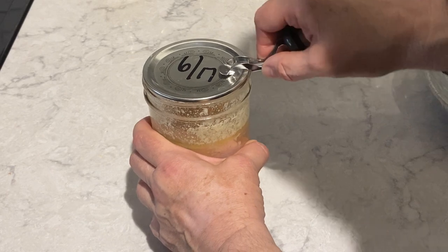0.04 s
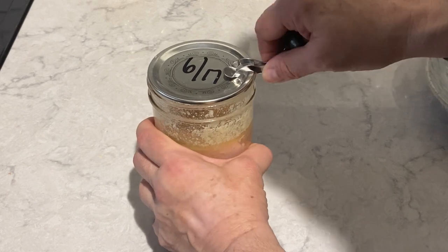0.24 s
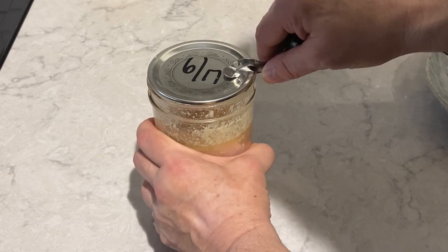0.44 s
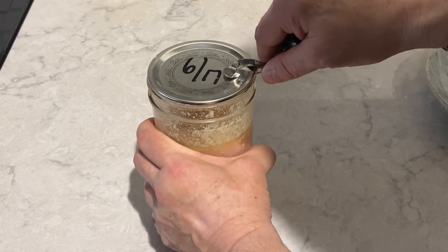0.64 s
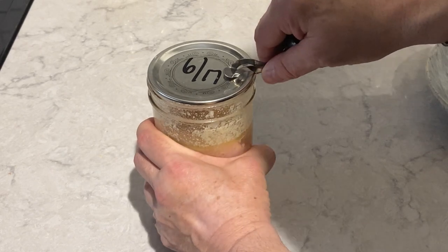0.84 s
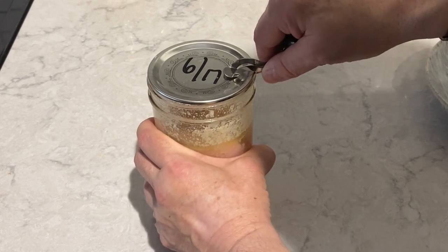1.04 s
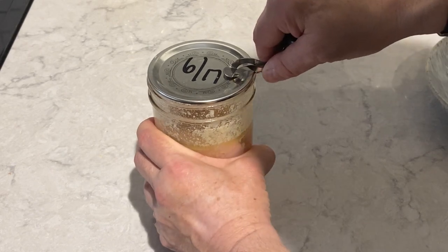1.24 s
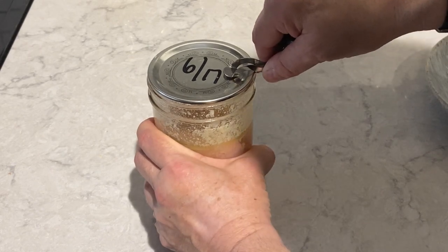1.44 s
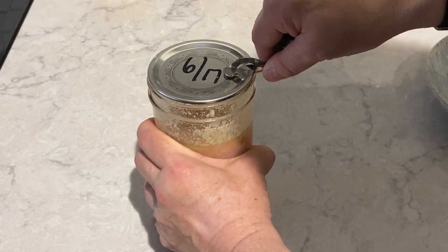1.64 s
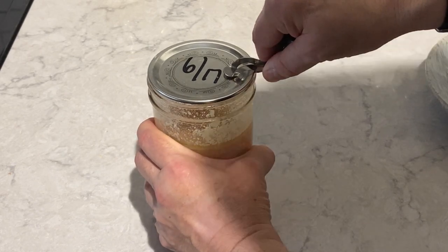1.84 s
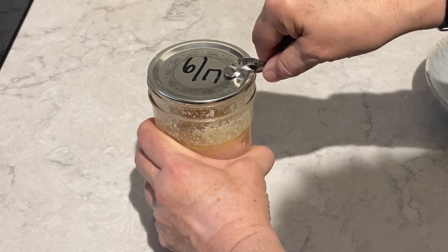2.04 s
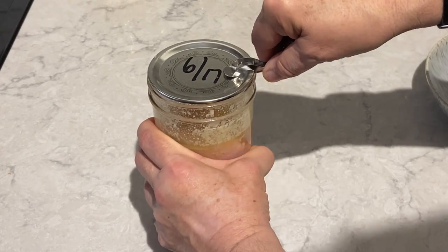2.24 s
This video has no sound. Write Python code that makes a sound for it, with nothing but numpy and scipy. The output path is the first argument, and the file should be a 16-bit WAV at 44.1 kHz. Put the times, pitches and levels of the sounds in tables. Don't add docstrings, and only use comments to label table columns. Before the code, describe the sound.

A loud, clipped knock of a metal opener on a sealed glass jar lid, then small ticks

```python
import sys
import numpy as np
from scipy import signal
from scipy.fft import rfft, irfft
from scipy.io import wavfile
from scipy.ndimage import uniform_filter1d

SR = 44100
rng = np.random.default_rng(int(sys.argv[2]) if len(sys.argv) > 2 else 0)


def persist_wave(psi):
    counts = np.round(np.clip(psi, -1, 1) * 32767).astype(np.int16)
    wavfile.write(sys.argv[1], SR, np.atleast_2d(counts).T)


def volts(x):
    e = np.asarray(x, float) / 20
    return 10 ** e


N = 101429
T = np.arange(N) / SR


def shape(x, gain_db):
    hz = np.arange(N // 2 + 1) * SR / N + 1
    return irfft(rfft(x) * volts(gain_db(hz)), N)


def curve(table):
    hz, db = np.array(table, float).T
    log_hz = np.log(np.r_[hz[0] / 8, hz, hz[-1] * 8])
    levels = np.r_[db[0] - 60, db, db[-1] - 60]
    return lambda f: np.interp(np.log(f), log_hz, levels)


def band(hz, wide):
    x = shape(rng.standard_normal(N), lambda f: -20 * np.log10(1 + ((f - hz * hz / f) / wide) ** 2))
    return x / x.std()


def fade(at, t60):
    return (T >= at) * volts(-60 * np.clip(T - at, 0, None) / t60)


def ring(at, hz, t60):
    return fade(at, t60) * np.sin(2 * np.pi * hz * (T - at))


def hump(at, length):
    return np.sin(np.pi * np.clip((T - at) / length, 0, 1)) ** 2


def walk(rate):
    width = int(SR / rate)
    x = uniform_filter1d(uniform_filter1d(rng.standard_normal(N), width), width)
    return x / x.std()


def kitchen():
    # pitch_hz, level_db (per Hz)
    rumble = [(22, -10.5), (38, -6), (62, 4), (120, -6), (200, -0.5), (260, -4), (420, -8.5), (650, -22.5)]
    # pitch_hz, level_db (per Hz)
    hiss = [(500, -22), (1200, -24), (2600, -28.5), (3100, -35.5), (5300, -42.5), (5800, -48.5),
            (8000, -54.5), (14000, -58.5)]
    # pitch_hz, level_db
    side_gain = [(40, -16.5), (200, -15), (500, -3), (1700, -4), (3300, -18), (7000, -2.5), (10000, 4),
                 (14000, -3)]
    # pitch_hz, width_hz, level_db
    hums = [(2103, 66, -65.5), (2640, 100, -77.5), (4200, 290, -75.5), (4970, 130, -83)]
    air_db, flicker_db, swell_db = -41, -0.22, 1
    air, wider = 0, curve(side_gain)
    for table in (rumble, hiss):
        colour = curve(table)
        flow = volts(flicker_db * walk(27.4) + swell_db * walk(0.47))
        mid = shape(rng.standard_normal(N), colour)
        side = shape(rng.standard_normal(N), lambda f: colour(f) + wider(f))
        air = air + flow * np.array([mid, side])
    hum = sum(volts(db) * band(hz, wide) for hz, wide, db in hums)
    return air * volts(air_db) / air[0].std() + hum * np.array([[1], [.2]])


def slips():
    slip_times = [.098, .497, .6405, .6678, .9215, 1.162, 1.2962, 2.2235]
    # ring_db, click_db, click_hz, sparkle_db
    slip_sounds = [(-64.5, -62, 5000, -72), (-58, -66, 5000, -68), (-52, -58, 6760, -72),
                   (-36.5, -31, 3700, -64), (-36, -35.5, 3400, -77), (-50, -46.5, 3700, -71),
                   (-37, -38, 3400, -52), (-30.5, -24, 3060, -63)]
    # pitch_hz, level_db, t60_s
    tool = [(2180, 0.5, 0.053), (2146, -20.5, 0.47), (2860, -10.5, 0.11), (1057, -10, 0.026),
            (815, -11.5, 0.099), (500, -6, 0.024), (6400, -36, .03)]
    snap_t60_s, rise_s = 0.0088, .0005
    spray_db, spray_t60_s, spray_wide_hz = -15.5, .03, 1780
    sparkle_t60_s = 0.027
    out, bright = 0, band(11100, 3550)
    luck = rng.standard_normal((len(slip_sounds), len(tool)))
    for at, (ring_db, click_db, click_hz, sparkle_db), dice in zip(slip_times, slip_sounds, luck):
        spray = volts(spray_db) * fade(at, spray_t60_s) * band(click_hz, spray_wide_hz)
        click = volts(click_db) * (ring(at, click_hz, snap_t60_s) + spray)
        sparkle = volts(sparkle_db) * fade(at, sparkle_t60_s) * bright
        tone = 0
        for (hz, db, t60), d in zip(tool, dice):
            tone = tone + volts(db + 2 * d) * ring(at, hz * (1 + 0.0046 * d), t60)
        onset = np.clip((T - at) / rise_s, 0, 1) ** 2
        out = out + (click + sparkle + volts(ring_db) * tone) * onset
    return out


def fingers():
    # start_s, length_s
    rub_times = [(.14, .05), (.635, .04), (1.87, .12), (2.02, .08)]
    rub_levels = [-71, -74, -88, -78]
    # start_s, length_s, pitch_hz, level_db
    squeaks = [(1.427, 0.046, 1235, -45), (1.429, 0.021, 1760, -46), (1.439, 0.033, 900, -50),
               (1.459, 0.013, 1660, -47.5), (1.474, 0.031, 280, -36)]
    skin = band(13000, 3500) + volts(0.5) * band(6300, 2000) + volts(14.5) * band(1700, 3000)
    skin = skin * volts(2.6 * walk(330))
    out = sum(volts(db) * hump(at, length) for (at, length), db in zip(rub_times, rub_levels)) * skin
    for at, length, hz, db in squeaks:
        tone = np.sin(2 * np.pi * hz * T + 0.42 * walk(62))
        out = out + volts(db) * hump(at, length) ** .5 * (tone + 0.41 * band(hz, 400))
    return out


def jar_body(blow_times):
    # level_db, contact_ms
    blows = [
        (-6, 0.29),
        (3.5, 0.39),
        (-10.5, 0.57),
    ]
    # pitch_hz, level_db, t60_s, side_share
    jar = [(177, -10, 0.29, 0.06), (226.8, -18.5, 0.66, .1), (346.5, -14, 0.092, 0.065),
           (392, -9, 0.071, .1), (452.6, -11, 0.16, 0.24), (513.7, -7.5, 0.077, 0.1),
           (579, -4.5, 0.026, 0.53), (648, -10, 0.078, 0.12), (790, -2, 0.047, 0.067),
           (1053, -3.5, 0.018, 0.41), (1144, 2.5, 0.025, 0.44), (1220, -2.5, 0.049, 0.39),
           (1765, -16, 0.14, .2), (2830, -26, 0.045, .2)]
    level_db, low_cut_hz = -7.5, 193
    swell_cycles = 2.22
    push = 0
    for at, (db, ms) in zip(blow_times, blows):
        push = push + volts(db) * hump(at, ms / 1000) / (ms / 1000 * SR / 2)
    mid, side = 0, 0
    for k, (hz, db, t60, share) in enumerate(jar):
        mode = volts(db) * ring(0, hz, t60) * (1 - fade(0, swell_cycles / hz))
        mid = mid + mode
        side = side + (-1) ** k * share * np.roll(mode, int(SR / hz / 5))
    body = volts(level_db) * signal.fftconvolve(np.array([mid, side]), push[None])[:, :N]
    return signal.lfilter(*signal.butter(2, low_cut_hz, "high", fs=SR), body)


def counter_rattle(at):
    # pitch_hz, level_db (per Hz)
    rattle_colour = [(250, -6.5), (500, 2.5), (1200, -6.5), (1600, -8), (2600, -16), (4500, -36.5),
                     (7000, -45), (12000, -59)]
    level_db, t60_s, rise_t60_s = -12, 0.2, 0.0067
    noise = np.array([shape(n, curve(rattle_colour)) for n in rng.standard_normal((2, N))])
    noise = volts(level_db) * noise / noise.std()
    return noise * fade(at, t60_s) * (1 - fade(at, rise_t60_s)) * np.array([[1], [.5]])


def lid_ring(at):
    pitch_hz, level_db, t60_s, swell_s = 2127, -21.5, 0.26, 0.0044
    gripped_s, grip_leaves, grip_t60_s = .284, .12, .02
    held = grip_leaves + (1 - grip_leaves) * fade(gripped_s, grip_t60_s)
    tone = volts(level_db) * ring(at, pitch_hz, t60_s) * (1 - fade(at, 7 * swell_s))
    return tone * np.where(T > gripped_s, held, 1) * np.array([[1], [-.2]])


def crack(at):
    level_db, t60_s = -35.5, 0.0077
    noise = band(2500, 2800) + volts(-25) * band(10000, 9000)
    return volts(level_db) * fade(at, t60_s) * noise * np.array([[1], [-.15]])


def knock():
    blow_times = [.1994, .2020, .2055]
    main = blow_times[1]
    return jar_body(blow_times) + counter_rattle(main) + lid_ring(main) + crack(main)


def room(x):
    level_db, t60_s, treble_loss, side_share = -12.5, 0.44, 0.11, 0.62
    t = T[:SR // 2]
    noise = rng.standard_normal((2, 2, len(t)))
    low = signal.lfilter(*signal.butter(2, 1500, fs=SR), noise[0])
    high = signal.lfilter(*signal.butter(2, 1500, "high", fs=SR), noise[1])
    tail = low * volts(-60 * t / t60_s) + high * volts(-60 * t / (t60_s * (1 - treble_loss)))
    tail = tail * np.clip(t / 0.0027, 0, 1)
    tail = tail / np.sqrt(np.sum(tail[0] ** 2)) * np.array([[1], [side_share]])
    return volts(level_db) * signal.fftconvolve(tail, x[None])[:, :N]


def scene():
    small = slips() + fingers()
    near = knock() + np.array([small, 0.57 * np.gradient(small)])
    mid, side = near + room(near[0]) + kitchen()
    return np.array([mid + side, mid - side])


def band_limit(x):
    return signal.sosfilt(signal.butter(12, 15600, fs=SR, output="sos"), x)


def dip(hz, wide, db):
    return lambda f: db * np.exp(-((f - hz) / wide) ** 4) - 24 * np.clip((f - 13600) / 1400, 0, 2)


def record(dry):
    mid = shape((dry[0] + dry[1]) / 2, dip(8960, 756, -26))
    side = shape((dry[0] - dry[1]) / 2, dip(12000, 1000, -16))
    mix = np.clip(np.array([mid + side, mid - side]), -1, 1)
    return band_limit(mix)


dry = scene()
out = record(dry)
persist_wave(out)
```